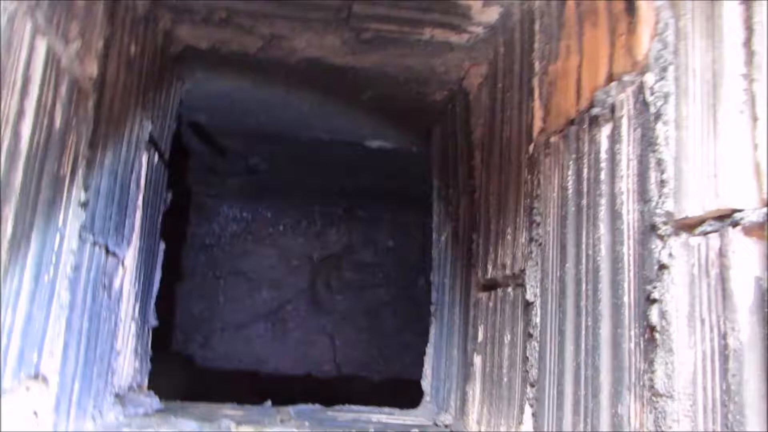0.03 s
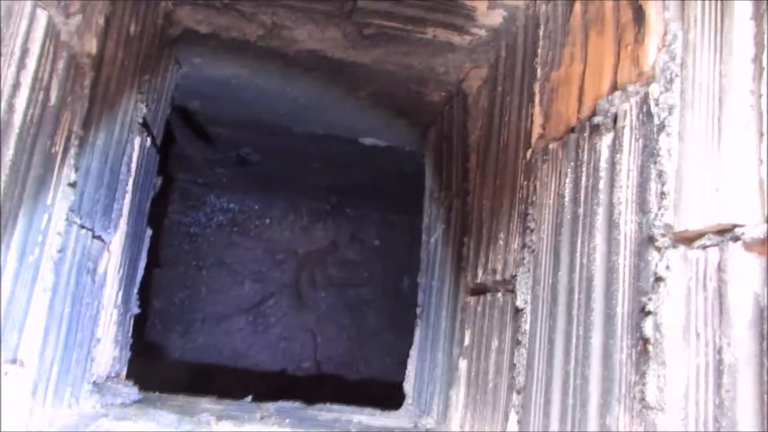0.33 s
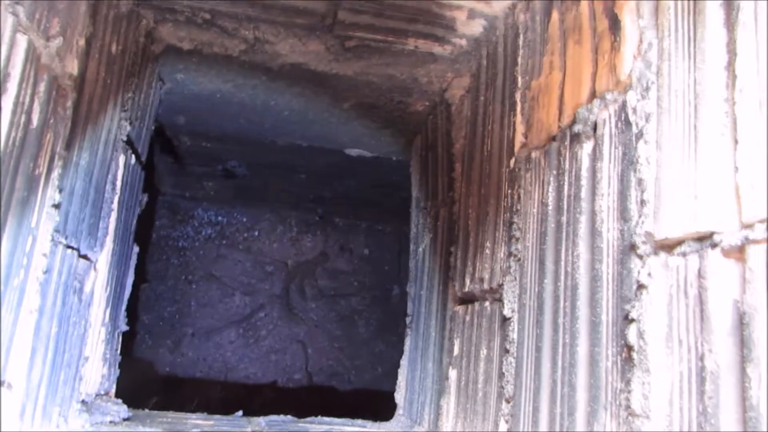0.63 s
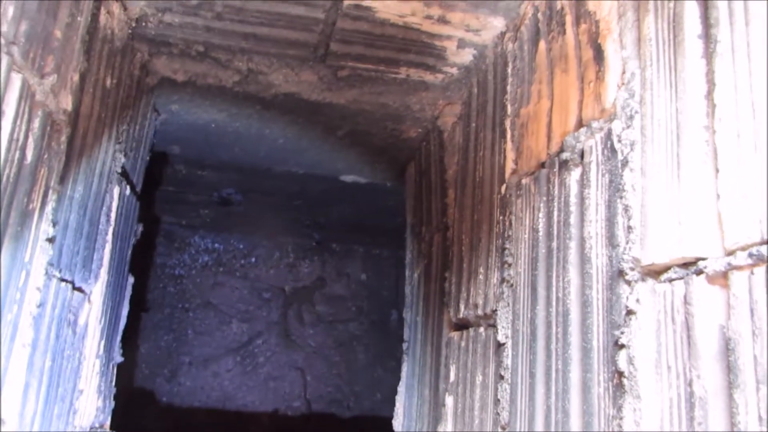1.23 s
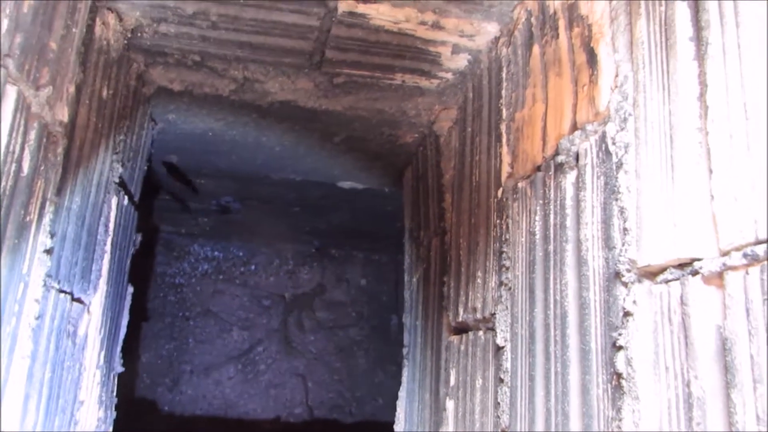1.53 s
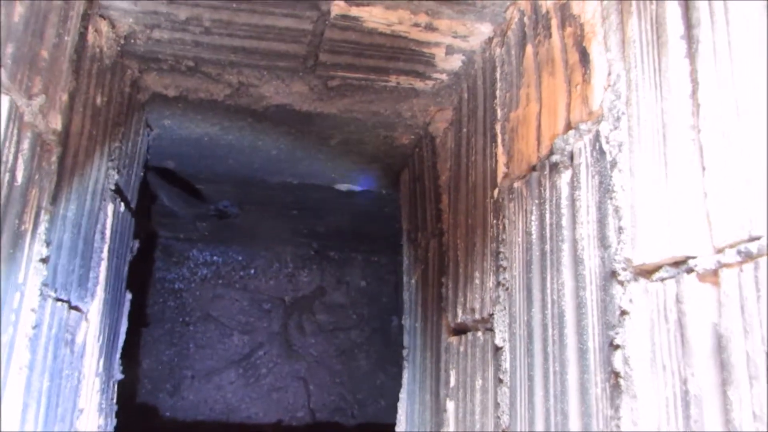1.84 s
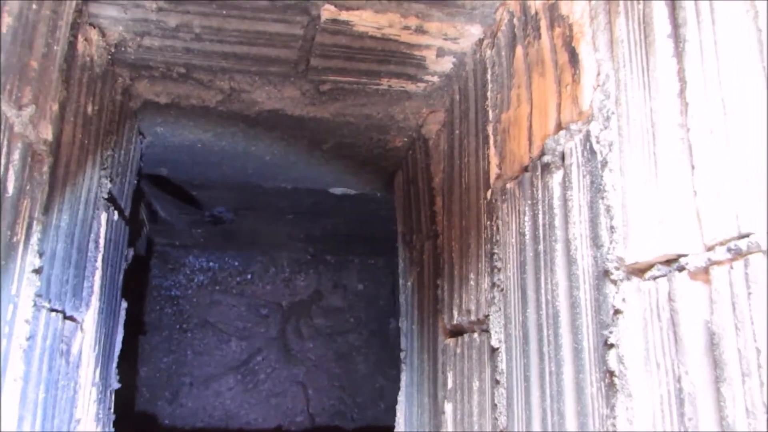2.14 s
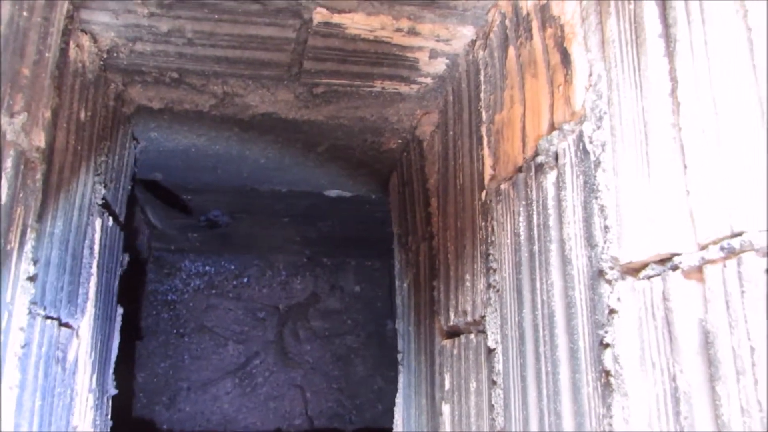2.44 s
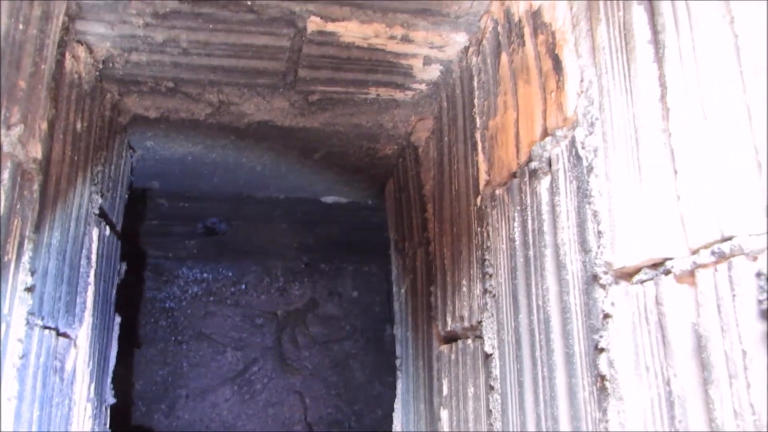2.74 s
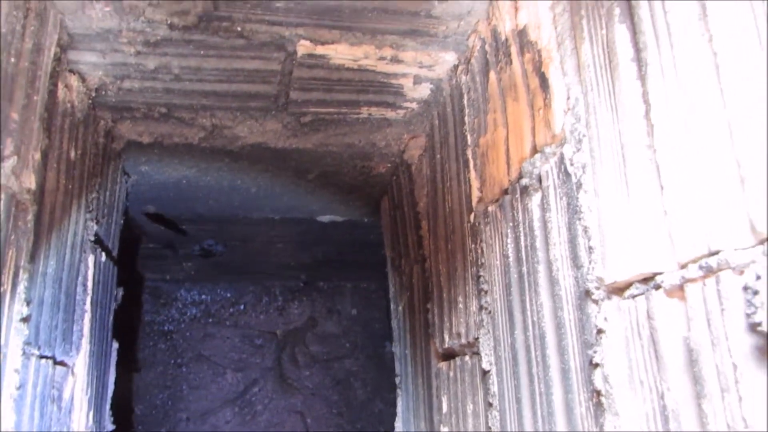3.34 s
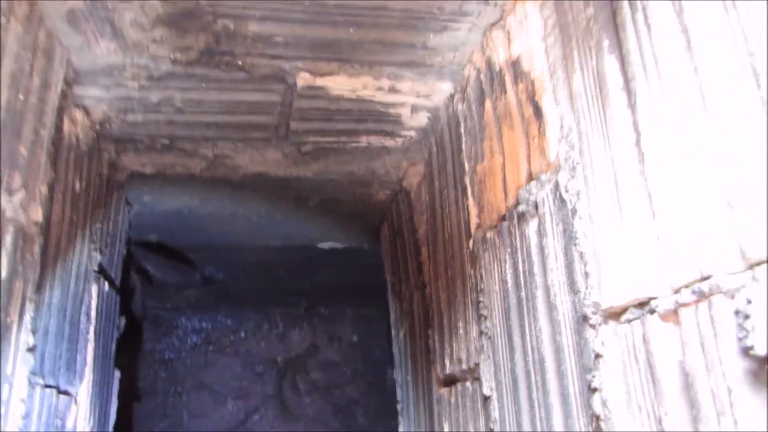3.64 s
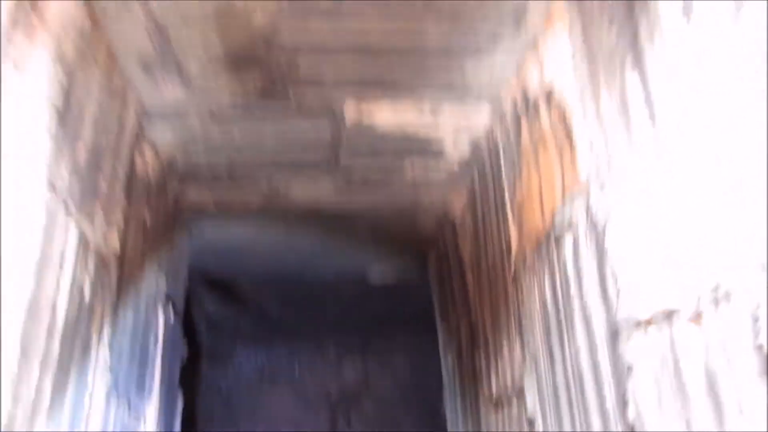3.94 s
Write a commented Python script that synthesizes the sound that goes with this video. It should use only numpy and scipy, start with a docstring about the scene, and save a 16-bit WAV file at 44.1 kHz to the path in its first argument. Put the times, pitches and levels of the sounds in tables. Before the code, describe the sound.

Close handling knocks, clicks and rubbing over light wind rumble and faint bird chirps.

```python
"""Fingers knock, tick, drag and scuff on the case of a hand-held camera, right at its stereo microphone.
The camera is moved about at the opening of a brick shaft; its hollow body rings and its thin shell clicks.
Light wind buffets the microphone, swinging the two channels against each other in the bass, and now and
then thumps it. Small birds whistle and chirp in the distance, over a low bed of outdoor air."""
import sys
import numpy as np
from scipy import signal
from scipy.fft import rfft, irfft, next_fast_len
from scipy.io import wavfile
from scipy.ndimage import uniform_filter1d, map_coordinates

SR = 44100
rng = np.random.default_rng(int(sys.argv[2]) if len(sys.argv) > 2 else 0)


def pcm_store(signal):
    """Save signal as 16-bit PCM."""
    levels = np.round(np.clip(np.atleast_2d(signal), -1, 1) * 32767)
    wavfile.write(sys.argv[1], SR, levels.astype(np.int16).T)


N = 176400

# outdoor air: frequency_hz, level_db
AIR_SPECTRUM = [(100,8),(330,10),(440,4.5),(570,-6),(760,-0.5),(1100,-10.5),(1600,-19),(6000,-27.5),(13500,-35.5),(16000,-56)]
# likeness of the left and right channels: frequency_hz, correlation (-1 to 1)
STEREO_LIKENESS = [(100,-0.064),(350,-0.47),(900,0.17),(2500,0.18),(8000,0.06)]
# distant bird notes: start_s, length_s, start_hz, middle_hz, end_hz, level_db, roughness (0 is pure)
BIRD_NOTES = [(0.162,0.13,6600,4820,3730,-58,0.06),(2.097,0.037,3210,3550,3660,-59.5,0),(2.188,0.063,5040,4940,4860,-55.5,0.3),(2.356,0.14,5800,5110,4900,-51,0.34),(2.546,0.125,4203,4467,3980,-47,0.2),(2.768,0.052,7660,7740,7800,-55,0),(2.793,0.054,6900,5900,4080,-50.5,1.67),(2.907,0.048,4040,4030,3440,-51,0.1),(2.971,0.059,6830,6660,6600,-48.5,0.12),(3.012,0.053,4200,3730,3250,-54.5,0.23),(3.15,0.081,5330,4800,4910,-45.5,0.5),(3.217,0.041,5850,6010,6130,-53,0.26),(3.252,0.053,4410,3840,2830,-46,0.3),(3.375,0.068,3950,3600,3130,-54,0.58),(3.497,0.049,7400,6680,6640,-50,0.5),(3.522,0.036,4620,4700,4800,-38.5,0.24),(3.62,0.042,3170,3270,3760,-50.5,0.85),(3.722,0.059,5320,5500,6300,-52.5,1.1),(3.766,0.11,6980,6710,6650,-54.5,0.95)]
# strength of the wind on the microphone: time_s, level_db
WIND_STRENGTH = [(0.12,-34.5),(0.31,-25.5),(0.44,-20),(0.62,-29.5),(0.78,-26),(0.89,-33),(0.95,-23.5),(1.26,-23),(1.38,-30.5),
                 (1.49,-21),(1.57,-25.5),(1.63,-50.5),(1.77,-22.5),(1.82,-40),(2.01,-50),(2.04,-30),(2.15,-36.5),(2.32,-22),(2.41,-28.5),
                 (2.75,-35.5),(2.97,-23.5),(3.03,-49),(3.08,-22.5),(3.17,-21.5),(3.22,-39),(3.49,-41),(3.53,-14.5),(3.61,-18),
                 (3.71,-50),(3.78,-18),(3.81,-54),(3.85,-19.5),(3.95,-38),(4.0,-20.5)]
# deep part of a gust: frequency_hz, level_db
BUFFET_SPECTRUM = [(10,-13),(30,1),(60,-1.5),(110,-5),(180,-19),(300,-36),(600,-60),(1500,-47),(4000,-120)]
# brighter part of a gust: frequency_hz, level_db
FLUTTER_SPECTRUM = [(50,-39),(130,-3),(220,-4),(380,-17.5),(900,-36),(4000,-120)]
# puffs that thump the microphone: centre_s, level_db, pitch_hz
WIND_PUFFS = [(.67,-13.5,95),(.93,-15,112),(1.116,-12.5,183),(1.237,-8,125),(1.485,-5.5,124),(1.559,-13,167),(2.324,-10,116),(2.963,-9.5,85),(3.088,-14.5,125),(3.529,-7.5,111),(3.541,-3,167),(3.582,-0.5,105),(3.832,-11.5,124)]
# skin sliding on the case: time_s, level_db
RUB_LEVEL = [(.11,-54),(.27,-48.5),(.47,-55),(.56,-49.5),(.69,-54),(.86,-42.5),(.95,-47.5),(1.06,-55),(1.65,-61),(2.25,-56),(2.47,-47.5),(2.52,-52),(2.75,-54.5),(3.05,-56.5),(3.4,-52.5),(3.72,-54),(4,-48.5)]
# sliding skin: frequency_hz, level_db
SKIN_SPECTRUM = [(200,-2),(700,15.5),(1100,14),(2000,5.5),(6000,1.5),(12500,-9),(15500,-26)]
# rasp in the shell: frequency_hz, level_db
RASP_SPECTRUM = [(300,-15),(550,-7.5),(720,0),(880,-16.5),(1100,-2.5),(1500,-5),(1900,-6),(2800,-9),(3800,-19),(15000,-45)]
# hiss above the rasp: frequency_hz, level_db
HISS_SPECTRUM = [(800,-59),(3000,8),(5000,10),(7500,6.5),(11000,3),(13500,0),(16000,-32)]
# fingers slipping on the case: start_s, hold_s, t60_s, rasp_db, hiss_db
FINGER_SCUFFS = [(0.291,0.004,0.027,-64,-40),(0.365,0.012,0.081,-33,-52),(.524,0.0027,0.023,-39.5,-50.5),(0.75,0.0074,0.022,-37.5,-49.5),(0.854,0.016,0.068,-34,-36),(0.915,0.0063,0.037,-36.5,-46),(0.997,0.00037,0.033,-28,-43),(2.59,0.023,0.18,-38,-37),(3.604,0.0034,0.052,-29,-49),(3.906,0.0026,0.055,-38.5,-45.5),(3.919,0.0069,0.073,-37,-62)]
# a finger dragging on the shell: start_s, hold_s, level_db
FINGER_DRAGS = [(0.86,0.0095,-34),(0.92,.006,-46),(2.454,0.0091,-36.5),(2.596,0.017,-37.5),(2.659,.014,-41.5)]
# the case giving way: start_s, level_db
CASE_CRUNCHES = [(1.7237,-25),(2.0424,-25.5)]
# dull pushes of the hand: start_s, level_db, pitch_hz
HAND_THUDS = [(0.863,-15.5,137),(3.53,-9,152),(3.571,-12.5,187)]
# sharp snaps of the plastic: start_s, level_db, pitch_hz, t60_s
PLASTIC_SNAPS = [(0.2467,-15.5,1715,0.015),(0.2467,-22,2710,0.01),(.678,-23.5,1260,0.014),(0.6947,-15,1620,0.0063),(1.0,0,1090,0.0097),(3.767,-18,1660,0.0067)]
# modes of the hollow body: pitch_hz, level_db, t60_s
BODY_MODES = [(266.5,-7,0.2),(341,-3.5,0.12),(409,-5.5,0.1)]
# modes of the thin shell: pitch_hz, level_db, t60_s
SHELL_MODES = [(748.5,-6,0.067),(978,-6.5,0.039),(1082,-9.5,0.048),(1342,-7,0.027),(1734,-2,0.011),(2300,-23.5,0.061),(2930,-16,.012)]
# finger knocks on the case: start_s, body_db, shell_db
FINGER_KNOCKS = [(.202,-39,-35.5),(.322,-12.5,-31),(.374,-15.5,-28.5),(0.4664,-17,-31),(0.729,-50,-38),(.75,-40,-56),(.801,-29.5,-35.5),(.832,-28,-41.5),(.953,-25.5,-40),(1,-20,-30),(1.018,-27,-31),(1.137,-22.5,-35),(1.177,-24.5,-33),(1.555,-29.5,-60),(1.602,-30.5,-47),(1.677,-31,-43),(1.725,-23,-52),(1.912,-31,-43),(2.047,-19.5,-24.5),(2.103,-28,-41),(2.161,-29,-38),(2.275,-29.5,-41.5),(2.382,-28.5,-39),(2.479,-29,-35.5),(2.611,-31,-50),(2.708,-29.5,-38.5),(2.902,-29.5,-39),(3.12,-28.5,-58),(3.258,-25,-29.5),(3.538,-18,-38),(3.766,-23,-34),(3.815,-44,-34.5)]


def amp(db):
    return 10 ** (np.asarray(db) / 20)


def unit(x):
    return x / np.sqrt(np.mean(x ** 2) + 1e-20)


def clock():
    return np.arange(N) / SR


def fade(t, t60):
    """Exponential decay that starts at t = 0."""
    return np.exp(-np.log(1000) * np.maximum(t, 0) / t60)


def along(points, hz):
    """Interpolate (frequency_hz, value) points on a log axis."""
    f, v = np.transpose(points)
    return np.interp(np.log(hz + 1), np.log(f + 1), v)


def curve(rows):
    """Interpolate (time_s, value) points, one value per sample."""
    return np.interp(clock(), *np.transpose(rows))


def wobble(rate):
    """A smooth random curve, rate knots a second."""
    return map_coordinates(rng.standard_normal(N // 8), [clock() * rate], mode="wrap")


def filtered(x, response):
    """Filter x by a gain given as a function of frequency."""
    m = next_fast_len(N + SR // 4)
    return irfft(rfft(x, m) * response(np.fft.rfftfreq(m, 1 / SR)), m)[..., :N]


def noise(spectrum, left_db, alike=STEREO_LIKENESS, grain_db=0):
    """Stereo noise of rms 1; grain_db breaks it into tiny slips."""
    def mid_and_side(hz):
        angle = np.arccos(np.clip(along(alike, hz), -1, 1)) / 2
        return amp(along(spectrum, hz)) * [np.cos(angle), np.sin(angle)]
    source = rng.standard_normal((2, N)) * amp(grain_db * wobble(1500))
    mid, side = filtered(source, mid_and_side)
    return unit(np.array([(mid + side) * amp(left_db), mid - side]))


def burst(s, hold, t60, attack):
    """An envelope that rises at time s and fades from s + hold."""
    t = clock() - s
    return np.clip(t / attack, 0, 1) * fade(t - hold, t60)


def add(out, s, sound):
    """Mix a stereo sound in at time s."""
    part = out[:, max(round(s * SR), 0):][:, :sound.shape[1]]
    part += sound[:, :part.shape[1]]


def air():
    """Steady outdoor air behind everything, louder on the left."""
    return amp(-41.5) * noise(AIR_SPECTRUM, left_db=5)


def birds():
    """Distant gliding whistles of wavering strength, some rough, with a short outdoor echo."""
    t, song = clock(), np.zeros(N)
    flutter = wobble(700)
    for s, length, start_hz, middle_hz, end_hz, db, roughness in BIRD_NOTES:
        on = (t >= s) & (t < s + length)
        progress = (t[on] - s) / length
        glide = np.polyfit([0, .5, 1], [start_hz, middle_hz, end_hz], 2)
        hz = np.polyval(glide, progress) * (1 + roughness * flutter[on] / 17)
        envelope = amp(db + 4) * np.sqrt(np.abs(np.sin(np.pi * progress)))
        song[on] += envelope * np.sin(2 * np.pi * np.cumsum(hz) / SR)
    song *= amp(3 * wobble(110) - 1)
    tail = rng.standard_normal((2, SR // 2)) * fade(t[:SR // 2], t60=.26)
    echo = signal.fftconvolve(song[None], tail / np.linalg.norm(tail[0]), axes=1)[:, :N]
    return song * amp([[-1], [1]]) + echo


def buffeting(spectrum, correlation):
    """Low noise of even strength, to be shaped by the wind."""
    x = noise(spectrum, left_db=-0.06, alike=[(100, correlation)])
    power = np.abs(uniform_filter1d(np.mean(x ** 2, axis=0), size=SR // 25))
    return unit(x / np.sqrt(power + 1e-9))


def wind():
    """Wind on the microphone: the buffeting gets louder and brighter as it strengthens."""
    strength_db = curve(WIND_STRENGTH) + 4.5
    rumble = amp(strength_db) * buffeting(BUFFET_SPECTRUM, correlation=-0.91)
    flutter = amp(1.386 * strength_db - 5.5) * buffeting(FLUTTER_SPECTRUM, correlation=-0.78)
    return rumble + flutter


def puffs(width_cycles=0.42, port_mismatch_rad=0.26):
    """Each puff thumps the microphone with one swing, nearly opposite left and right."""
    out = np.zeros((2, N))
    for s, db, hz in WIND_PUFFS:
        cycles = (clock() - s) * hz
        phase = 2 * np.pi * cycles + rng.normal()
        envelope = amp(db + 7.5) * np.exp(.5 - np.hypot(cycles / width_cycles, .5))
        out += envelope * np.array([-.85 * np.cos(phase), np.cos(phase + port_mismatch_rad)])
    return out


def rub():
    """Skin slides on the case in dense, uneven slips."""
    grit_db = 2 * wobble(20) + 2.5 * wobble(400)
    return amp(curve(RUB_LEVEL) + 2 + grit_db) * noise(SKIN_SPECTRUM, left_db=-0.5, grain_db=1)


def swish(low_cut_hz=9400):
    """A faint high swish swells at the end."""
    level_db = curve([(3.65, -80), (3.82, -61.5), (4, -58.5)])
    hiss = noise(HISS_SPECTRUM, left_db=-2)
    return amp(level_db) * unit(filtered(hiss, lambda hz: 1 / (1 + (low_cut_hz / (hz + 1)) ** 10)))


def scuffs():
    """Quick slips of the fingers rasp in the shell and hiss above it."""
    rasp_level, hiss_level = np.zeros((2, N))
    for s, hold, t60, rasp_db, hiss_db in FINGER_SCUFFS:
        slip = burst(s, hold, t60, attack=hold / 2)
        rasp_level += amp(rasp_db) * slip
        hiss_level += amp(hiss_db) * slip
    rasp = rasp_level * noise(RASP_SPECTRUM, left_db=1.5, grain_db=6)
    hiss = hiss_level * noise(HISS_SPECTRUM, left_db=-1.5, alike=[(1000, .45)], grain_db=3)
    return rasp + hiss


def drags(pitch_hz=1094, width_hz=99):
    """A dragging finger keeps one hollow resonance of the shell ringing."""
    press = sum(amp(db) * burst(s, hold, t60=0.032, attack=hold / 2) for s, hold, db in FINGER_DRAGS)
    resonance = [(pitch_hz / 2, -40), (pitch_hz - width_hz, -14), (pitch_hz, 0),
                 (pitch_hz + width_hz, -14), (pitch_hz * 2, -50), (SR / 2, -120)]
    return press * noise(resonance, left_db=2, alike=[(pitch_hz, .5)])


def crunches(hold_s=0.0092):
    """The case gives way: a rasp in the shell under a shorter bright crack."""
    rasp_level = sum(amp(db) * burst(s, hold_s, t60=0.061, attack=0.0051) for s, db in CASE_CRUNCHES)
    crack_level = sum(amp(db - 8) * burst(s, hold_s, t60=0.02, attack=0.0038) for s, db in CASE_CRUNCHES)
    rasp = rasp_level * noise(RASP_SPECTRUM, left_db=6, grain_db=1)
    crack = crack_level * noise(HISS_SPECTRUM, left_db=1.5, grain_db=1)
    return rasp + crack


def thuds():
    """The whole case moves under the hand: a low, quickly damped swing, the same in both channels."""
    return sum(amp(db) * burst(s, hold=0, t60=0.066, attack=0.0019)
               * np.sin(2 * np.pi * hz * (clock() - s)) for s, db, hz in HAND_THUDS)


def ring(modes, right_db, scatter=0):
    """Damped modes of the case, shifted in level and phase at the right microphone port."""
    t, out = np.arange(SR // 4) / SR, 0
    for hz, db, t60 in modes:
        size, detune, start_phase = scatter * rng.standard_normal(3)
        phase = 2 * np.pi * hz * (1 + detune / 50) * t + start_phase
        shift = np.arccos(np.clip(along(STEREO_LIKENESS, hz), -1, 1))
        ports = np.array([np.sin(phase), amp(right_db) * np.sin(phase + shift)])
        out = out + amp(db + 2 * size) * fade(t, t60) * ports
    return out * (1 - np.exp(-t / .0006))


def snaps():
    """Short pitched clicks of the plastic; the loudest leaves a faint ring."""
    out = np.zeros((2, N))
    for s, db, hz, t60 in PLASTIC_SNAPS:
        add(out, s, ring([(hz, db, t60)], right_db=-3))
    add(out, 1.001, ring([(1365, -38, .2)], right_db=1))
    return out


def swing(cycles, right_db=-4):
    """About one cycle of motion, weaker and opposite at the right port."""
    envelope = np.exp(.5 - np.hypot(2 * cycles, .5))
    return envelope * np.cos(2 * np.pi * cycles) * np.array([[-1], [amp(right_db)]])


def knocks(blow_hz=325.6, contact_s=0.00341, rebound_s=.0165, rebound_db=-14):
    """A fingertip lands with one heavy swing and a weak rebound; the body rings and the shell clicks."""
    body, shell, blows = np.zeros((3, 2, N))
    t = np.arange(SR // 20) / SR
    for s, body_db, shell_db in FINGER_KNOCKS:
        hz = blow_hz * np.exp(rng.normal() / 10)
        blow = swing((t - contact_s) * hz) + amp(rebound_db) * swing((t - rebound_s) * hz)
        add(blows, s, amp(body_db + 11) * blow)
        add(body, s, amp(body_db + 2) * ring(BODY_MODES, right_db=-5.5, scatter=0.87))
        add(shell, s, amp(shell_db + 8) * ring(SHELL_MODES, right_db=-7.5, scatter=1))
    soft_contact = signal.butter(7, 508, fs=SR, output="sos")  # a padded fingertip drives only the lows
    return blows + signal.sosfilt(soft_contact, body) + shell


def scene():
    """Close handling and wind on the microphone, over outdoor air and distant birds."""
    background = air()
    handling = knocks() + snaps() + thuds() + crunches() + drags() + rub() + swish() + scuffs()
    return background + handling + wind() + puffs() + birds()


def record(dry, open_s=0.1, limit_db=-1.5, recovery_db_per_s=30, top_hz=15100):
    """The microphone opens, the hardest thumps clip before a limiter ducks, and the band ends steeply."""
    opened = np.clip((clock() - open_s) / 0.0038, 0, 1)
    needed_db = np.minimum(0, limit_db - 20 * np.log10(np.abs(dry).max(axis=0) + 1e-9))
    recovery_db = recovery_db_per_s * clock()
    gain_db = np.minimum.accumulate(needed_db - recovery_db) + recovery_db
    lagging_db = uniform_filter1d(gain_db, size=128, origin=63)  # about 3 ms to duck
    limited = dry * opened * amp(lagging_db)
    clipped = limited / (1 + np.abs(limited) ** 20) ** (1 / 20)
    return filtered(clipped, lambda hz: 1 / np.sqrt(1 + (hz / top_hz) ** 120))


dry = scene()
out = record(dry)
pcm_store(out)
```